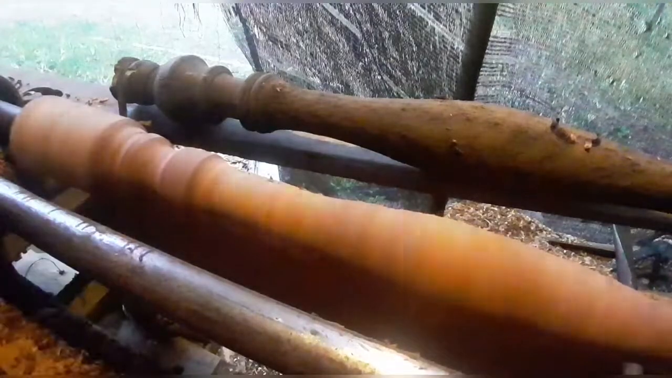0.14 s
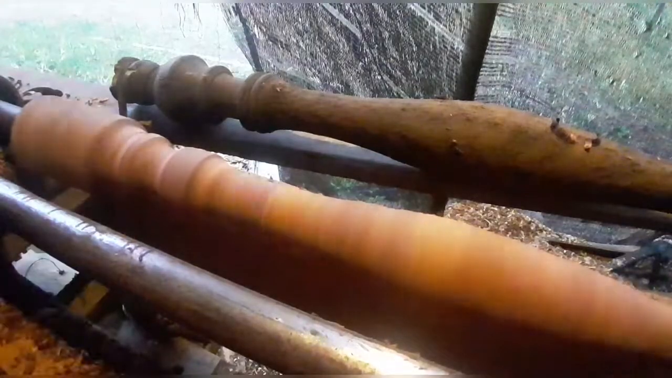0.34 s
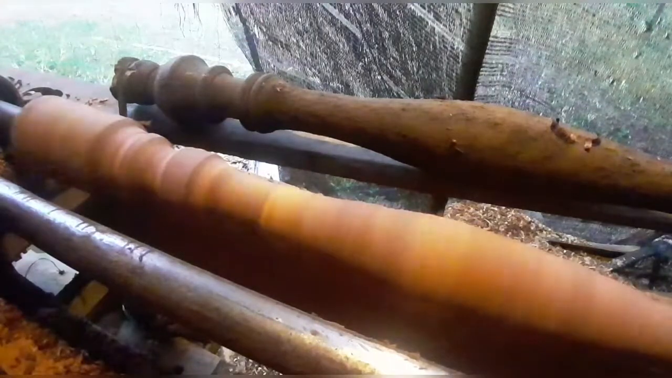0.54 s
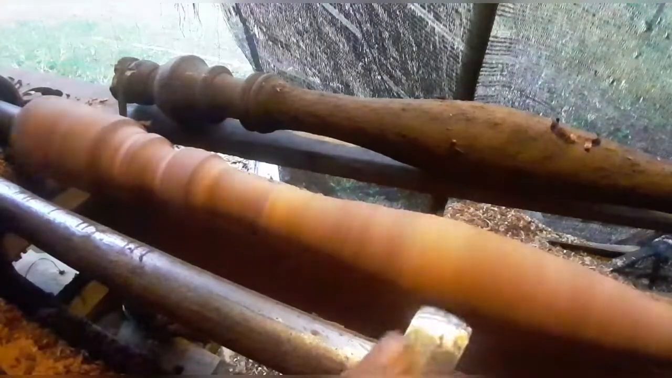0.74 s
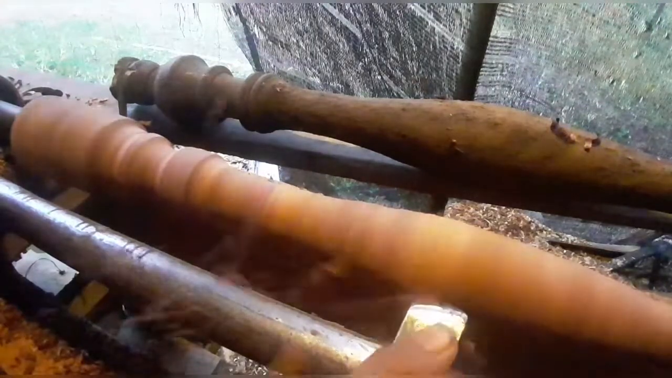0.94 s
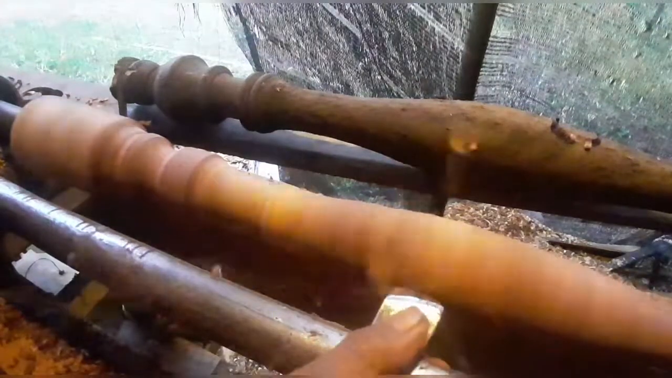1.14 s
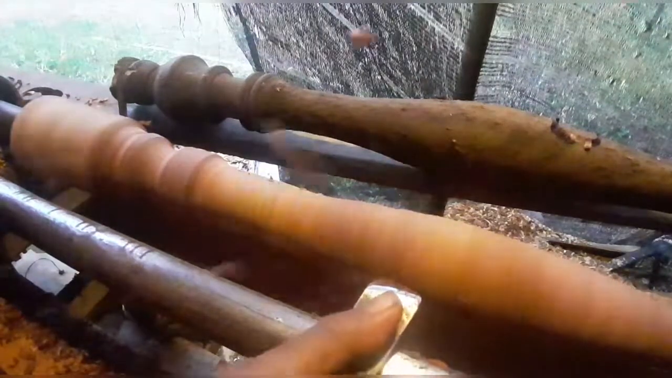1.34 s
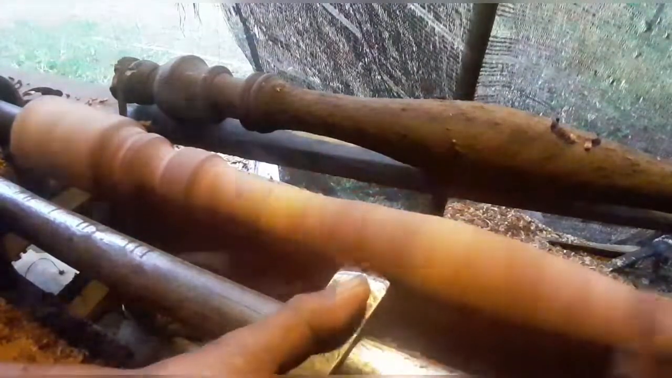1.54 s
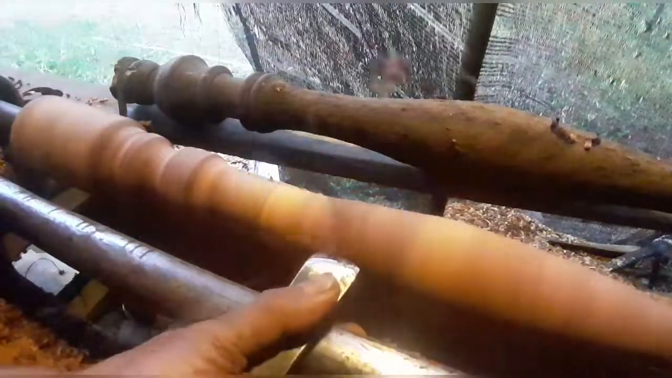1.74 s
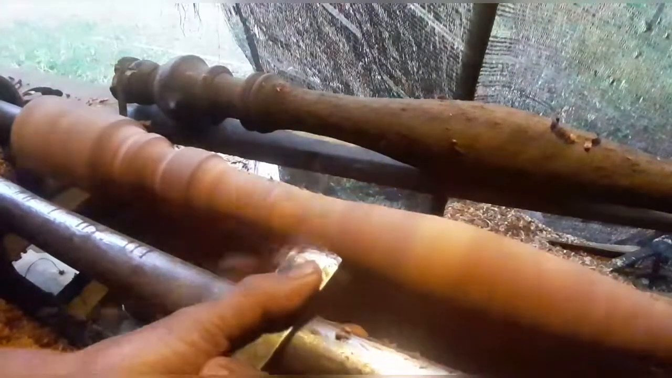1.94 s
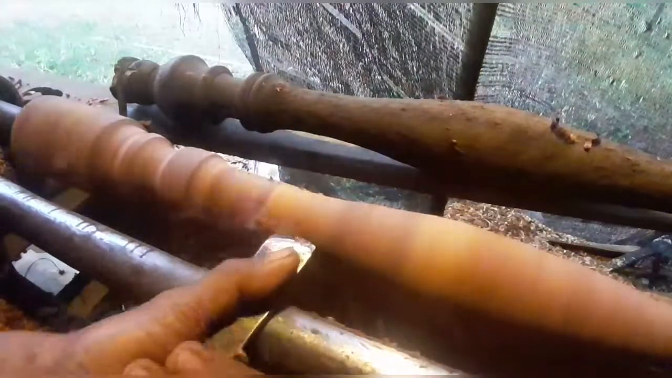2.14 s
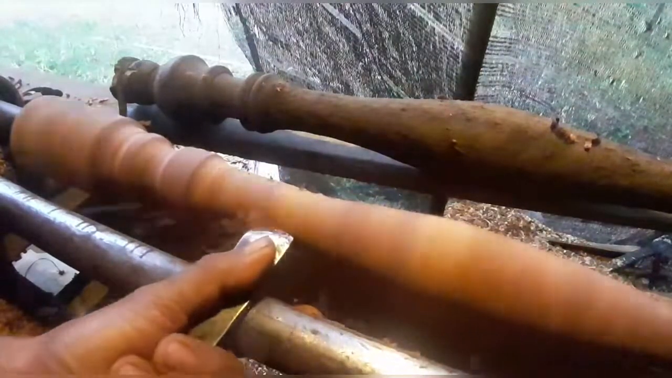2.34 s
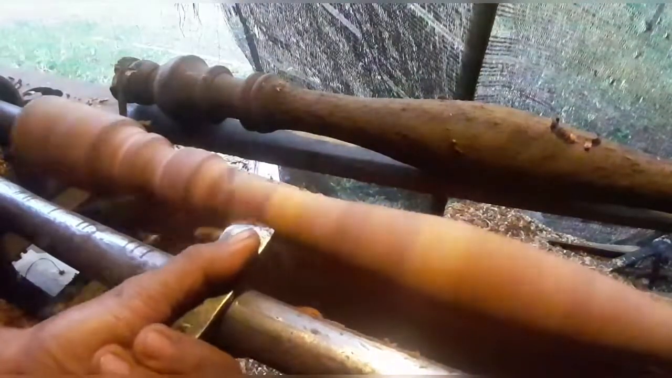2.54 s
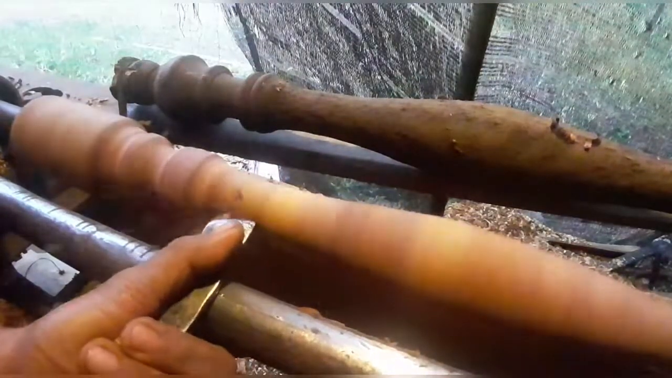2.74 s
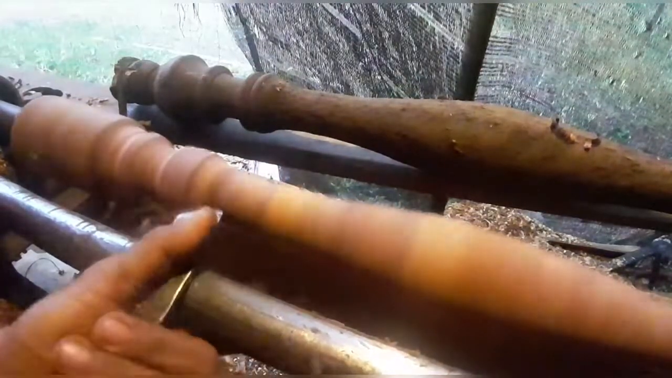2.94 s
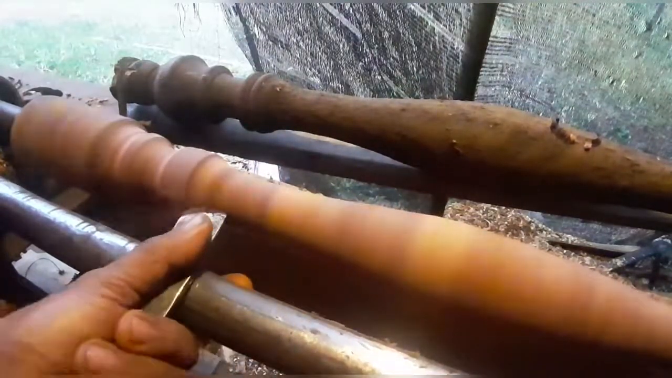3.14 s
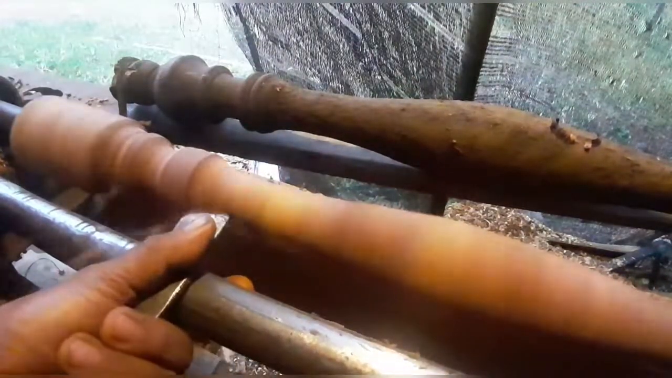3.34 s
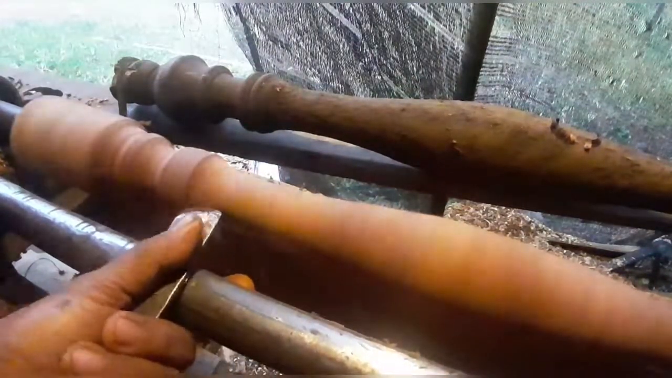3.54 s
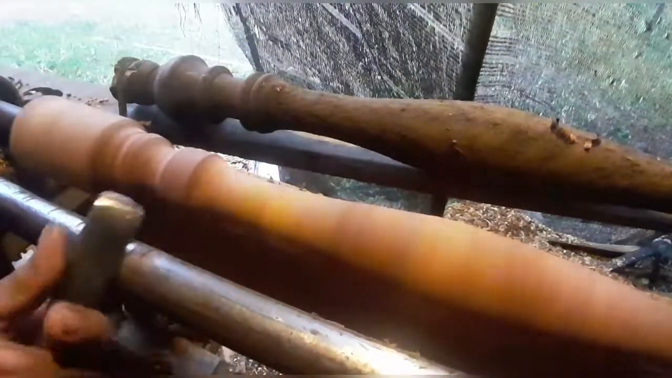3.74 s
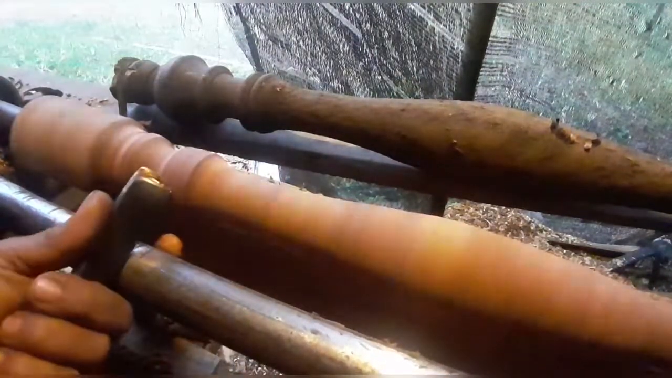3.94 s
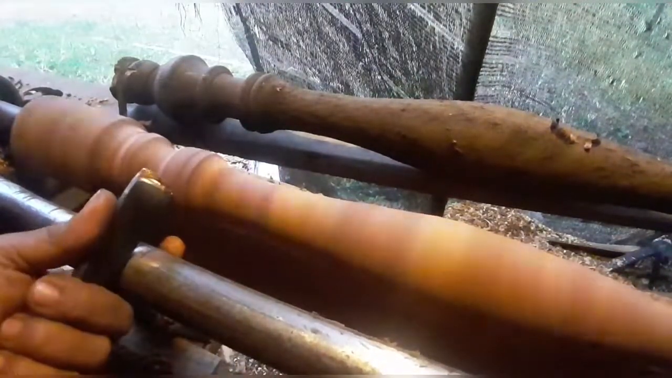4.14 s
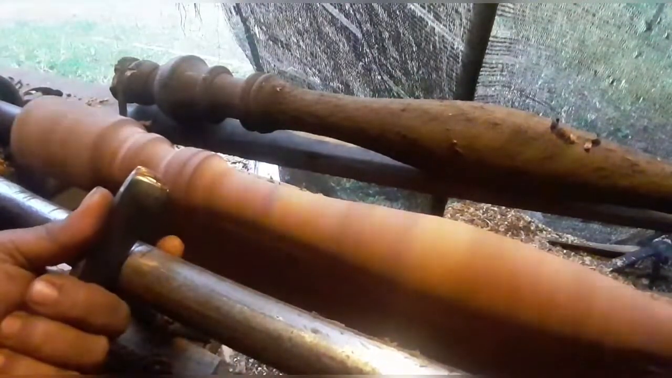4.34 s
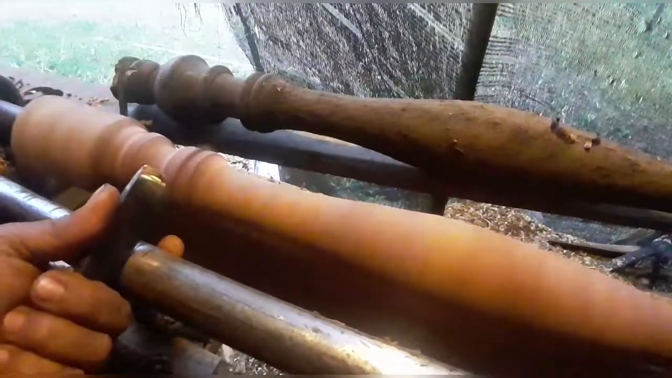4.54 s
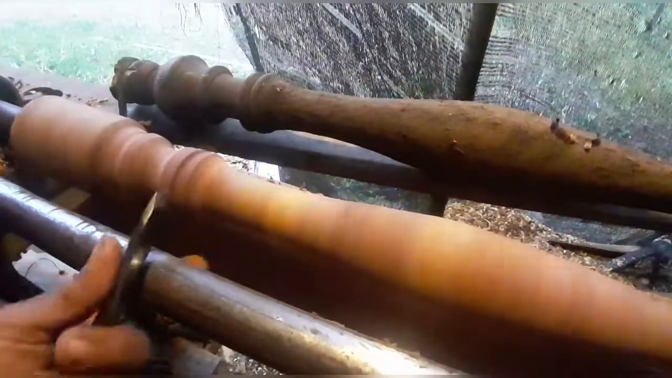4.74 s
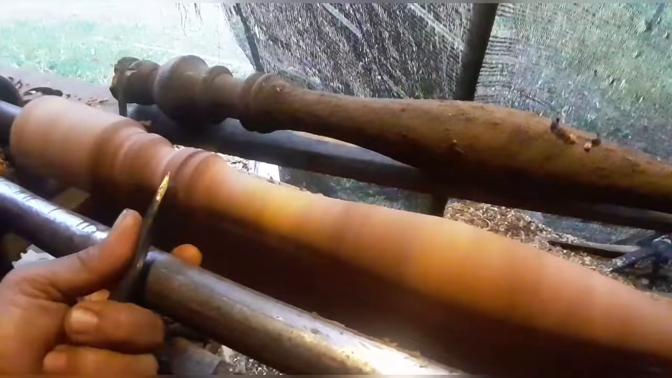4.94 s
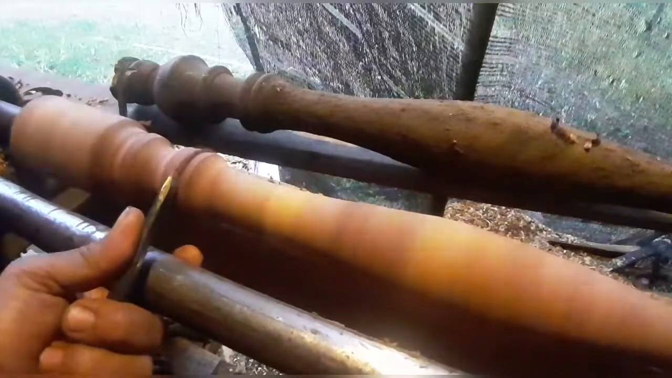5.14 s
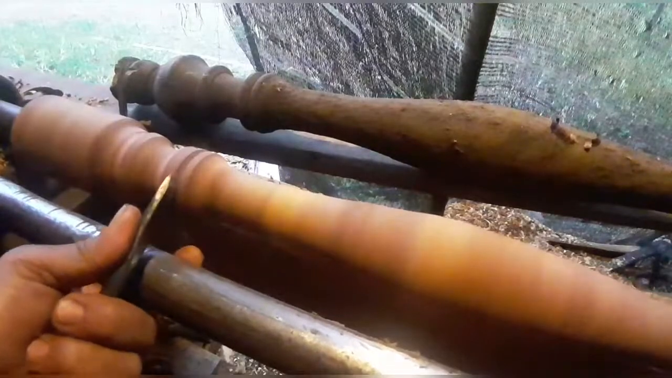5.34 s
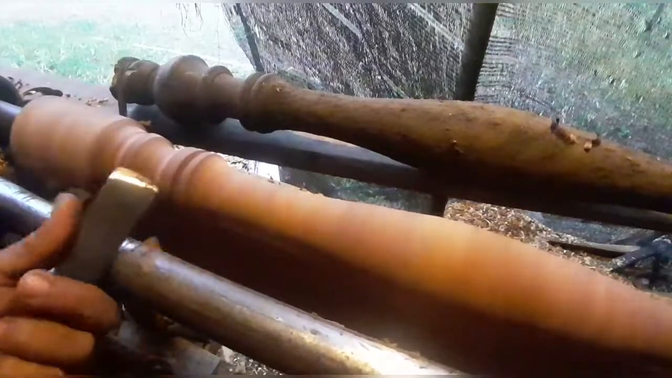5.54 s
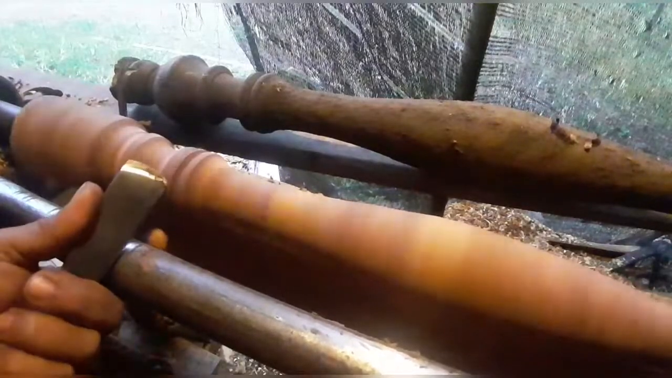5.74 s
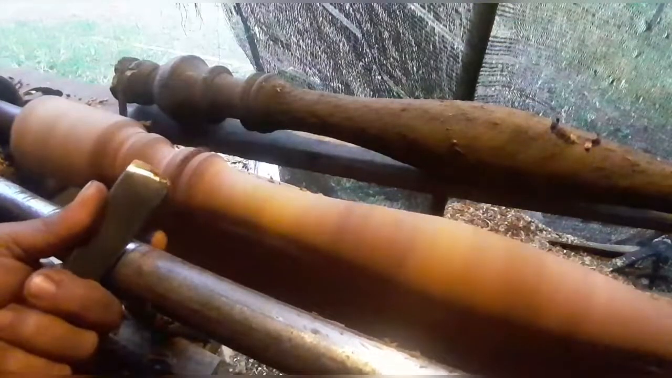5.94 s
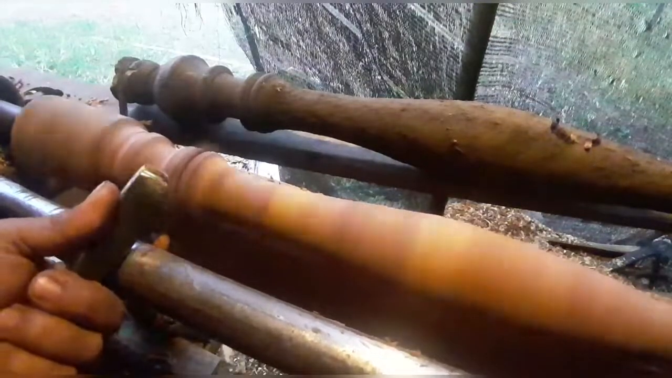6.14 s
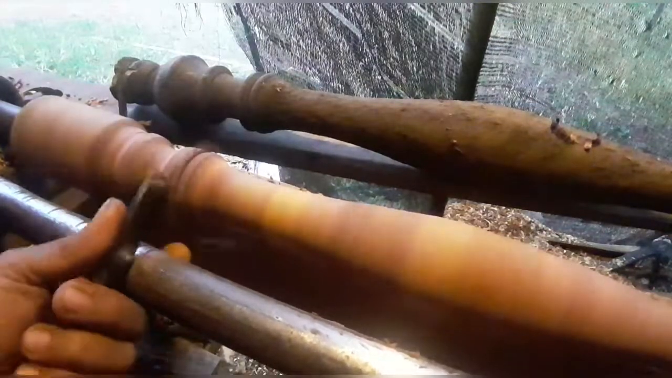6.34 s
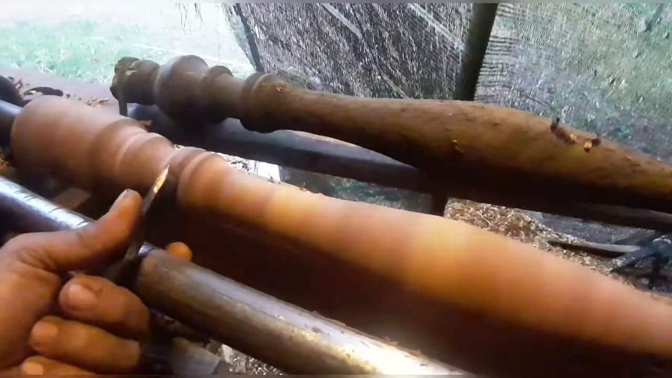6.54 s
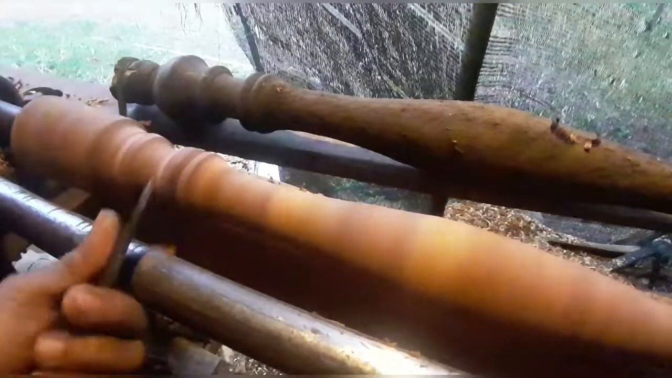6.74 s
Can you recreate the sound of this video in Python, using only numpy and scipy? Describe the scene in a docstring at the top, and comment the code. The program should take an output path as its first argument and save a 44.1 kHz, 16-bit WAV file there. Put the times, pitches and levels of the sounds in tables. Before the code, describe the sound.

A wood lathe drones and knocks rapidly close by as a chisel takes one long hissing, ringing cut, shavings thudding, then short light scrapes.

```python
"""Wood lathe in an open shed

A wood lathe drones close by: its drive knocks about 74 times a second through the resonant housing.
A hand-held chisel takes one long ringing cut, then short light ones, the later ones with a skew chisel;
torn fibres are shaped noise, the steel rings as resonances, and light touches squeak. Flying shavings
thud as pressure pulses on the microphone, mostly on the left port at first, later on both."""
import sys
import numpy as np
from scipy import signal
from scipy.fft import rfft, irfft, next_fast_len
from scipy.io import wavfile
from scipy.ndimage import uniform_filter1d, map_coordinates

SR = 44100
rng = np.random.default_rng(int(sys.argv[2]) if len(sys.argv) > 2 else 0)


def materialize(psi):
    """Save the field psi as 16-bit PCM at rate SR to the path in sys.argv[1].

    A 1-D psi becomes a single channel; in a 2-D psi each row is a channel.
    """
    bounded = np.clip(np.atleast_2d(psi).T, -1, 1)
    quanta = np.round(bounded * 32767).astype(np.int16)
    wavfile.write(sys.argv[1], SR, quanta)


N = 303832

# strokes of the tools, a list for each: (time [s], scrape drive [dB], edge ring drive above the scrape drive [dB])
STROKES = [
    [(1.105, -28.5, 15.5), (1.12, -30.5, 11.5), (1.15, -40, 10.5), (1.2, -25, 10), (1.3, -25, 4),
     (1.47, -27, 7.5), (1.77, -25.5, 3), (1.88, -29, 5), (1.94, -20.5, 0), (2.06, -31, 9.5),
     (2.09, -36.5, 5), (2.12, -25.5, 7), (2.3, -42, 11.5), (2.46, -31, 2), (2.48, -30.5, 2), (2.8, -33, 3),
     (3.01, -27, -2.5), (3.18, -37, 5.5), (3.22, -22.5, -4), (3.34, -27.5, -29), (3.35, -53, -8)],
    [(3.415, -49, 2), (3.421, -39, -2), (3.509, -27.5, -14), (3.527, -19, -22), (3.593, -34, -12),
     (3.629, -26.5, -22), (3.799, -27, -15), (3.83, -41.5, -5)],
    [(4.2, -50, 5), (4.208, -43, 5), (4.26, -52, 6), (4.38, -45, 3), (4.446, -53, 9), (4.46, -70, 4)],
    [(4.57, -60, 0), (4.586, -43, 3.5), (4.79, -43.5, 6), (4.83, -39.5, 8), (4.882, -34, -7),
     (4.95, -47, -2)],
    [(5.26, -61, 0), (5.268, -43.5, 3), (5.45, -35.5, -2), (5.584, -34.5, 0), (5.642, -26, 3),
     (5.678, -28, -10), (5.69, -31, 3)],
    [(6.0, -47, 0), (6.01, -31, 4), (6.046, -44, -8), (6.056, -36.5, 2), (6.25, -35.5, -2),
     (6.288, -31.5, -4), (6.394, -40.5, 8), (6.424, -29.5, 2), (6.53, -42, -7)],
    [(6.68, -45, 1), (6.75, -57, -5), (6.76, -42.5, 7), (6.842, -32.5, -5), (6.89, -38, 5)],
]


def amp(db):
    """Decibels to gain."""
    return 10 ** (np.asarray(db) / 20)


def unit(x):
    """Scaled to rms 1 over all channels together."""
    return x / np.sqrt(np.mean(x ** 2) + 1e-20)


def along(points, hz):
    """Values of (frequency [Hz], value) points, interpolated on a log frequency axis."""
    f, values = np.transpose(points)
    return np.interp(np.log(hz + 1), np.log(f + 1), values)


def curves(rows, outside=None):
    """One value per sample for each column after the time."""
    s, *columns = np.transpose(rows)
    t = np.arange(N) / SR
    return [np.interp(t, s, column, outside, outside) for column in columns]


def wobble(rate):
    """A smooth random curve with the given number of knots a second."""
    knots = rng.standard_normal(int(N * rate / SR) + 4)
    return map_coordinates(knots, [np.arange(N) * rate / SR])


def filtered(x, response):
    """x times a complex response of frequency, padded so that tails do not wrap round."""
    m = next_fast_len(N + SR // 2)
    return irfft(rfft(x, m) * response(np.fft.rfftfreq(m, 1 / SR)), m)[..., :N]


def modes(table, sign=-1):
    """The causal response of resonances; by default each next one has the opposite sign."""
    def response(f):
        total = 0
        for k, (centre, width, db) in enumerate(table):
            damping = 1j * f * width
            total = total + sign ** k * amp(db) * damping / (centre ** 2 - f ** 2 + damping)
        return total
    return response


def shade(spectrum):
    """The zero-phase response of a (frequency [Hz], level [dB]) spectrum."""
    return lambda f: amp(along(spectrum, f))


def noise(alike):
    """Two channels of white noise whose correlation is alike."""
    turn = np.arccos(np.clip(alike, 0, 1)) / 2
    common = np.cos(turn) * rng.standard_normal(N)
    apart = np.sin(turn) * rng.standard_normal(N)
    return np.array([common + apart, common - apart])


def patchy(x, patchy_db):
    """x with patches of random gain in time and frequency."""
    z = signal.stft(x, nperseg=256)[2]
    field = rng.standard_normal(z.shape[1:])
    field = uniform_filter1d(field, size=4, axis=0)  # across frequency
    field = uniform_filter1d(field, size=7, axis=1)  # across time
    return signal.istft(z * amp(patchy_db * unit(field)), nperseg=256)[1][:, :N]


def beat(rate_hz, jitter, scatter_db):
    """Uneven impulses at a mean rate; the timing drifts by jitter, a part of one interval."""
    k = np.arange(int(N / SR * rate_hz))
    turns = k + np.cumsum(jitter * rng.standard_normal(len(k)))
    sizes = amp(scatter_db * rng.standard_normal(len(k)))
    at = np.clip(turns / rate_hz * SR, 0, N - 1).astype(int)
    return np.bincount(at, sizes, N)


def lathe():
    """Knocks of the drive ring the housing and stir its noise; belt and bearings whirr, the bed rumbles."""
    # loudness of the lathe as heard, lower under the heavy cut and rising again after: (time [s], level [dB])
    drone_levels = [(0.0, -27.5), (0.68, -27.5), (0.7, -24), (0.9, -21), (1.09, -20.5), (1.19, -25),
                    (1.32, -32.5), (2.01, -34), (2.24, -30.5), (2.66, -31.5), (3.22, -24.5), (3.28, -31.5),
                    (3.84, -31.5), (4.22, -28.5), (4.62, -24), (4.85, -21.5), (5.3, -20.5), (6.3, -21.5),
                    (6.89, -21)]
    # resonances of the housing: (frequency [Hz], width [Hz], gain [dB])
    housing_modes = [(672.5, 17, -4), (729, 56, -12.5), (822, 97, -4), (887, 41, -1.5), (913, 24, 2.5),
                     (1120, 55, -13.5)]
    # band limit that keeps the housing ring free of hiss: (frequency [Hz], width [Hz], gain [dB])
    housing_band = [(858, 770, 0)]
    # noise colour of belt and bearings: (frequency [Hz], relative density [dB])
    whirr_colour = [(260, -66), (450, -24), (477, -27), (538, -39), (614, -14.5), (652, -10), (903, -1.5),
                    (1270, -13), (1810, -14.5), (1920, -15.5), (3970, -24), (5420, -35), (6470, -31.5),
                    (15500, -58)]
    # noise colour of bed and stand: (frequency [Hz], relative density [dB])
    rumble_colour = [(15, -57.5), (25, -25.5), (167, 1.5), (220, -9), (263, -1.5), (324, -8), (359, -9),
                     (441, -4), (477, -10.5), (550, -2), (720, -42), (1210, -120)]
    level_db, = curves(drone_levels)

    knocks = beat(rate_hz=74, jitter=.04, scatter_db=1.6)
    puffs = filtered(knocks, lambda f: 1 / (1 + 1j * f / 45))  # each knock leaves a short rattle
    rattle = (.3 + unit(puffs)) * noise(alike=.95)
    drive = .85 * unit(knocks - knocks.mean()) + .36 * unit(rattle)

    def ring(f):
        together = modes(housing_modes, sign=1)(f)  # all modes start with the same sign
        return together * modes(housing_band)(f) ** 2

    housing = unit(filtered(drive, ring))
    whirr = unit(filtered(amp(1.64 * wobble(30)) * noise(0.23), shade(whirr_colour)))
    rumble = unit(filtered(amp(2.0 * wobble(17)) * noise(0.99), shade(rumble_colour)))
    return amp(level_db) * (housing + amp(-3) * whirr + amp(-12) * rumble)


def pressure():
    """The blank runs out of round: contact swells with each turn, unevenly, about a levelled mean power."""
    # (time [s], mean spindle rate [Hz], swell once a turn [dB], swell twice a turn [dB])
    chatter = [(0, 57.5, 1.5, 6), (1.75, 57.5, 1.5, 5.5), (2.1, 56.7, 3.5, 2.5), (3.2, 56.7, 4, 2),
               (3.5, 56.7, 1.5, 1.5), (6.89, 56.7, 1.5, 1.5)]
    spindle_hz, once_db, twice_db = curves(chatter)
    uneven_hz = spindle_hz * (1 + .13 * wobble(30))
    phase = 2 * np.pi * np.cumsum(uneven_hz) / SR
    turn_db = once_db * np.cos(phase) + twice_db * np.cos(2 * phase)
    swell = amp(turn_db + 2.04 * wobble(60))
    return swell / np.sqrt(np.abs(uniform_filter1d(swell ** 2, size=6000)))


def catches():
    """The envelope of brief catches of the edge: clear ones, and snags that follow the long cut's scrape."""
    # the edge catches or touches: (time [s], drive [dB])
    clear_catches = [(1.106, -7), (1.1506, -10), (1.3663, -12), (1.5389, -5), (1.817, -12), (1.856, -14),
                     (1.891, 0), (2.092, 0.5), (2.273, -7), (2.295, -7.5), (2.4718, -4), (2.598, -24),
                     (2.6446, -12), (2.8668, -5.5), (3.0524, -8), (3.1682, -4), (3.2081, -15), (3.2839, 3),
                     (3.3211, -1.5), (3.5209, 0.5), (3.538, 1), (3.629, -4.5), (3.68, 0.5), (3.7105, -4),
                     (3.8526, -12.5), (3.9164, -9), (4.0078, -23), (4.8239, -13), (5.8008, 1),
                     (5.9544, -17), (6.421, -14)]
    snag_count, snag_db, snag_scatter_db = 24, 13, 11  # level above the scrape drive, and its spread either way
    t60_s, rise_s = 0.047, .0004
    s, level_db, _ = np.transpose(STROKES[0])
    when = rng.uniform(s[0], s[-1], snag_count)
    spread_db = rng.uniform(-snag_scatter_db, snag_scatter_db, snag_count)
    snags = np.c_[when, np.interp(when, s, level_db) + snag_db + spread_db]

    t = np.arange(SR // 5) / SR
    jolts = np.zeros(N + SR)
    for start, db in np.r_[clear_catches, snags]:
        jolt = amp(db - 60 * t / t60_s) * (1 - np.exp(-t / rise_s))
        jolts[round(start * SR):][:len(t)] += jolt
    return jolts[:N]


def chisel():
    """Fibres tear in bursts, ring the edge and shank of the steel and shake the spindle."""
    # balance of the voices: (time [s], shank drive above the edge drive [dB], shudder above the scrape [dB]),
    # both before the fixed gains below
    grip = [(1.1, -1.5, -9), (1.5, -2.5, -5), (1.95, 1.5, -3.5), (2.3, -6.5, -4), (2.6, -3, -0.5),
            (3.0, 7, 1), (3.3, 3, 1.5), (3.6, 12, -2.5), (4.3, -3.5, 3), (4.8, -4, 9), (5.5, -2, 3),
            (6.2, -3, -3), (6.8, -10, 1.5)]
    # noise colour of tearing wood: (frequency [Hz], relative density [dB])
    fibre_colour = [(180, -12), (300, -5.5), (432, -11.5), (633, 2.5), (825, -11), (896, -3), (1150, -8),
                    (1470, 1.5), (3670, -9.5), (5030, -4.5), (15800, -19.5)]
    # noise colour of the flexing spindle: (frequency [Hz], relative density [dB])
    flex_colour = [(25, -1), (60, 1.5), (115, 13.5), (200, -18), (350, 6), (600, -20)]
    # edge ring of the first tool: (frequency [Hz], width [Hz], gain [dB])
    edge_modes = [(6040, 450, -7.5), (6770, 200, -11), (7970, 250, -1), (8365, 360, -3.5),
                  (8500, 360, -7.5), (10300, 190, -13.5), (11400, 150, -17), (12500, 180, -23)]
    # edge ring of a second tool, a skew chisel: (frequency [Hz], width [Hz], gain [dB])
    skew_modes = [(5800, 120, -0.5), (7870, 200, -4), (8480, 140, -7), (10700, 100, -51)]
    # ring of the tool shank: (frequency [Hz], width [Hz], gain [dB])
    shank_modes = [(1553, 36, -8.5), (1876, 120, -5), (2930, 87, -22), (4000, 74, -4.5), (4190, 49, 1.5),
                   (5220, 15, -15), (5800, 130, -20)]
    skew_s = 4.1  # the skew chisel is taken up
    steel_share = 0.49  # part of a catch that rings the steel; the rest tears wood

    scrape, high = np.zeros((2, N))
    for stroke in STROKES:
        level_db, ring_db = curves(stroke, outside=-200)
        scrape += amp(level_db)
        high += amp(level_db + ring_db)
    shank_db, shudder_db = curves(grip)
    low = high * amp(shank_db)
    shudder = scrape * amp(shudder_db)

    bite = pressure()
    jolts = catches()
    rip = (1 - steel_share) * jolts
    clang = steel_share * jolts

    fibres = unit(filtered(patchy(noise(0.27), patchy_db=3.0), shade(fibre_colour)))
    tear = (amp(4.0) * scrape * bite ** 0.7 + amp(-10.0) * rip) * fibres

    strike = (amp(15.5) * high * bite + amp(1.5) * clang) * patchy(noise(0.81), patchy_db=1.0)
    with_skew = np.arange(N) > skew_s * SR
    edge = filtered(strike * ~with_skew, modes(edge_modes))
    edge = edge + filtered(strike * with_skew, modes(skew_modes))

    shake = (amp(17) * low * bite + amp(3.5) * clang) * patchy(noise(0.41), patchy_db=1.5)
    shank = filtered(shake, modes(shank_modes))
    flex = unit(filtered(amp(2.4 * wobble(12)) * noise(0.86), shade(flex_colour)))
    return tear + edge + shank + amp(-5) * shudder * flex


def shavings():
    """A shaving presses on a port: a quick dip, a push, then a slow swing back."""
    # clear thuds: (time [s], level before the common gain [dB])
    thuds = [(1.227, -20), (1.241, -17), (1.288, -9), (1.323, -12), (1.348, -15.5), (1.368, -16),
             (1.386, -15), (1.433, -21), (1.473, -12.5), (1.504, -15.5), (1.538, -14.5), (1.557, -12),
             (1.567, -15), (1.576, -12), (1.601, -13), (1.615, -15), (1.651, -12), (1.669, -19),
             (1.685, -13), (1.743, -14.5), (1.757, -13.5), (1.876, -19), (1.929, -22), (2.109, -24),
             (2.158, -30), (2.248, -34), (2.998, -20), (3.21, -26), (3.253, -18.5), (3.285, -11.5),
             (3.536, -13.5)]
    # the spray swings from the left port to both as the tool moves along: (time [s], left minus right level [dB])
    spray = [(1.7, 32), (2.2, 3), (3.0, -4)]
    crumb_count = 30  # small chips at chance moments of the heaviest spray
    push_s, push_scatter = .001, .3  # typical rise of the push, and its spread as a natural log

    crumb_s = rng.uniform(1.2, 2.0, crumb_count)
    crumb_db = rng.normal(-25, 3.5, crumb_count)
    hits = np.r_[thuds, np.c_[crumb_s, crumb_db]]
    t = np.arange(SR // 12) / SR
    out = np.zeros((2, N + SR))
    for s, db in hits:
        rise_s = push_s * np.exp(push_scatter * rng.standard_normal())
        u = np.maximum(t - .0011, 0) / rise_s
        dip = np.exp(-(t - .0009) ** 2 / 0.00035 ** 2)
        swing_back = (u / 5) * np.exp(1 - u / 5)
        pulse = u * np.exp(1 - u) - 0.34 * swing_back - 0.71 * dip
        side_db = np.interp(s, *np.transpose(spray))
        port_db = np.array([[min(side_db, 0)], [-max(side_db, 0)]])  # only the weaker side is turned down
        start = round(s * SR)
        out[:, start:start + len(t)] += amp(db + 6.5 + port_db) * pulse
    return out[:, :N]


def squeaks():
    """A light touch makes one resonance, fed with noise, sing brokenly for a moment."""
    # narrow tones: (start [s], end [s], frequency [Hz], width [Hz], level [dB])
    touches = [(2.45, 3.2, 1470, 40, -37), (3.55, 3.683, 306, 30, -28), (3.642, 3.81, 347, 35, -30),
               (3.913, 3.966, 5580, 50, -29.5), (3.918, 3.982, 4210, 50, -31.5),
               (4.002, 4.065, 4170, 50, -35), (5.378, 5.646, 4900, 45, -38.5),
               (6.068, 6.356, 1895, 70, -28), (6.233, 6.494, 3270, 200, -39)]
    out = np.zeros((2, N))
    for start, end, hz, width, db in touches:
        gate, = curves([(start, 0), (start + 0.0071, 1), (end - .03, .6), (end, 0)])
        tone = filtered(noise(0.32), modes([(hz, width, 0)]))
        out += amp(db) * gate * unit(amp(3.0 * wobble(40)) * tone)
    return out


def nearby(x):
    """A few close surfaces send treble back, by a different path to each port."""
    # bed, tool rest and bench: (left delay [s], left level [dB], right delay [s], right level [dB])
    echoes = [(.0011, -10, .0004, -11), (.0019, -12, .0027, -11), (.0043, -15, .0035, -14)]

    def bounce(f, s, db):
        treble = 1j * f / (1500 + 1j * f)
        return amp(db) * np.exp(-2j * np.pi * f * s) * treble

    def paths(f):
        return 1 + sum(np.array([bounce(f, left_s, left_db), bounce(f, right_s, right_db)])
                       for left_s, left_db, right_s, right_db in echoes)

    return filtered(x, paths)


def ports(x):
    """The two microphone ports differ in colour, and sound reaches the right one later."""
    # (frequency [Hz], left minus right level [dB])
    port_colour = [(60, 9), (110, -4.5), (200, -2.5), (380, 0.5), (700, -3.0), (1290, -4), (2380, 1),
                   (4400, -2.5), (8120, 9.5), (11500, -5), (15000, -6.5)]
    lag_s = 0.0002583

    def response(f):
        half_db = along(port_colour, f) / 2
        late = np.exp(-2j * np.pi * f * lag_s)
        return np.array([amp(half_db), amp(-half_db) * late])

    return filtered(x, response)


def scene():
    """Lathe and chisels through the air, shavings straight on the ports."""
    through_air = lathe() + chisel() + squeaks()
    return ports(nearby(through_air)) + shavings()


def record(dry):
    """The microphone drops deep bass and the last treble; loud peaks round off below a ceiling."""
    top_hz = 16279  # nothing is kept above
    bass_cut = filtered(dry, lambda f: (1j * f / (60 + 1j * f)) ** 2)
    soft = bass_cut / (1 + np.abs(bass_cut / 1.02) ** 8) ** (1 / 8)
    return filtered(soft, lambda f: (f < top_hz) / (1 + (f / 15420) ** 130))


dry = scene()
out = record(dry)
materialize(out)
```